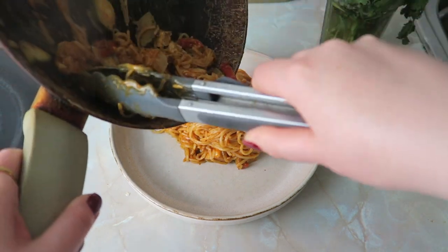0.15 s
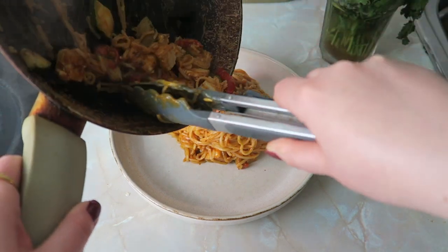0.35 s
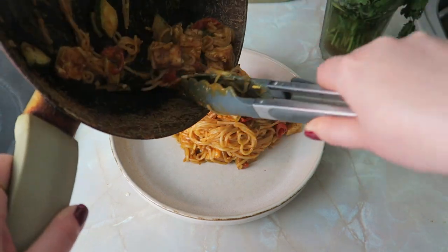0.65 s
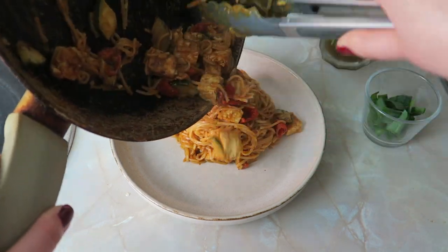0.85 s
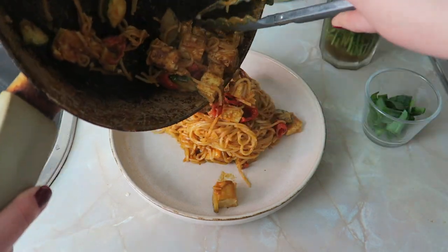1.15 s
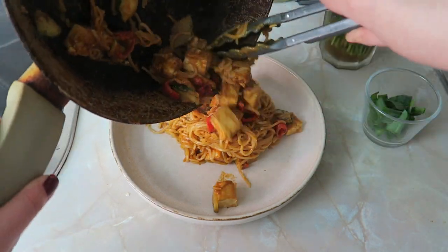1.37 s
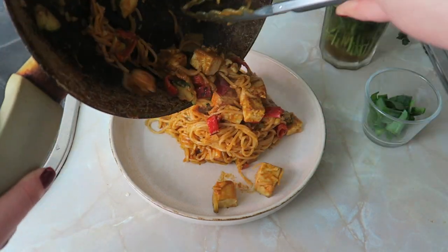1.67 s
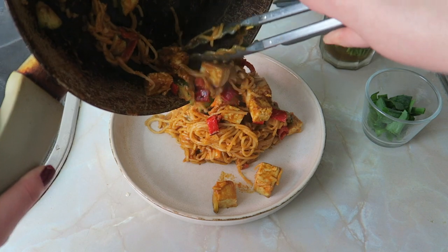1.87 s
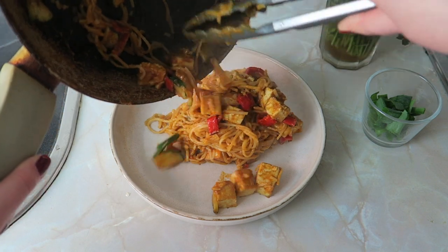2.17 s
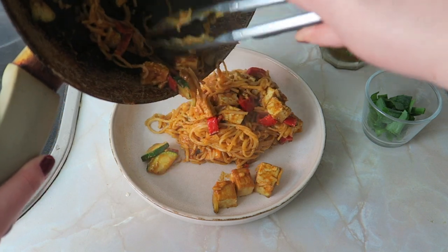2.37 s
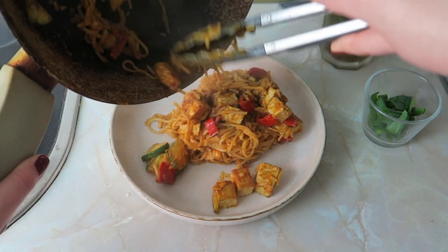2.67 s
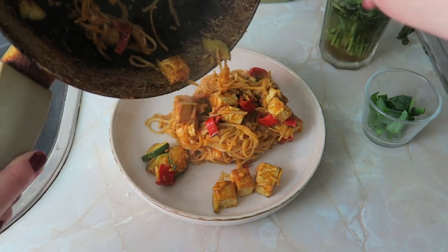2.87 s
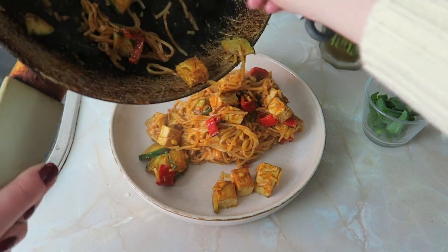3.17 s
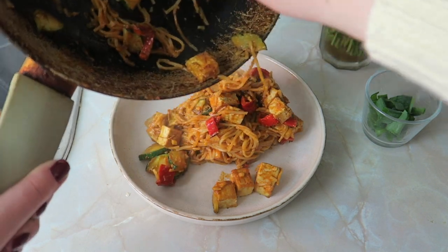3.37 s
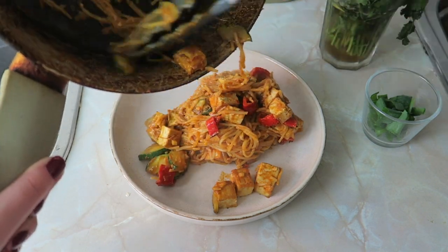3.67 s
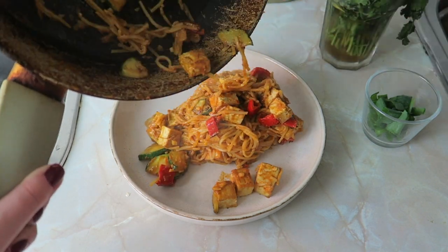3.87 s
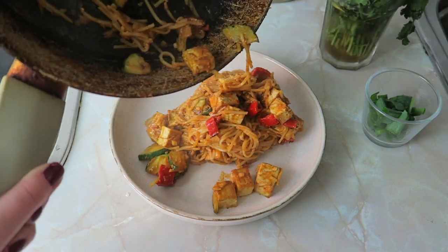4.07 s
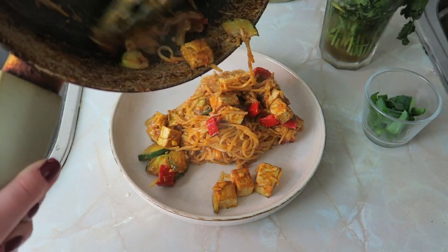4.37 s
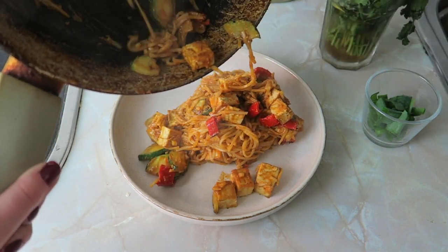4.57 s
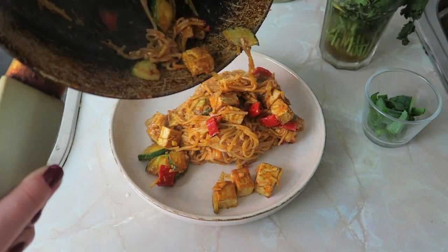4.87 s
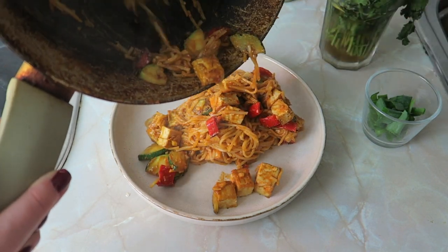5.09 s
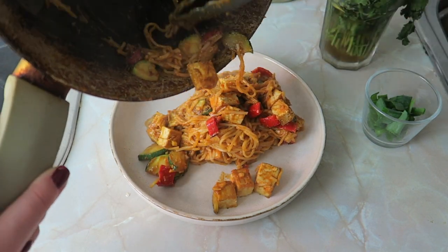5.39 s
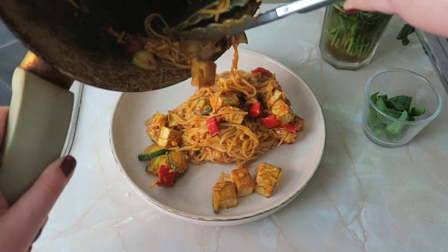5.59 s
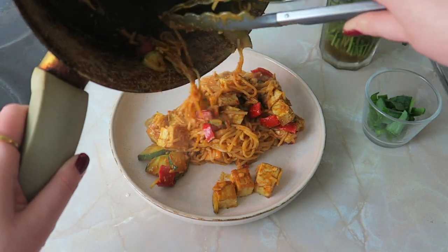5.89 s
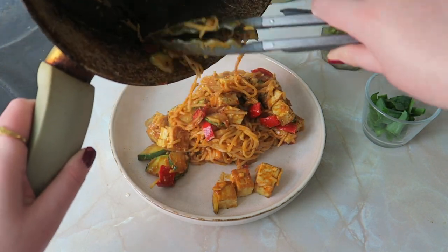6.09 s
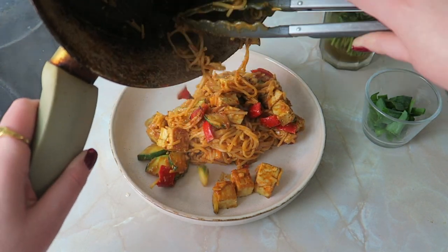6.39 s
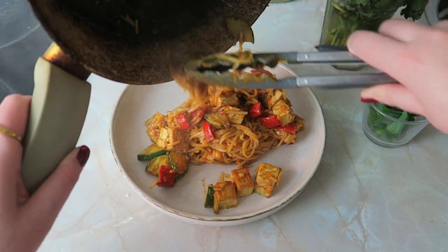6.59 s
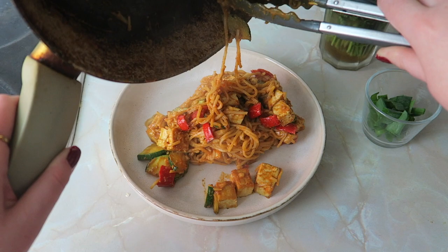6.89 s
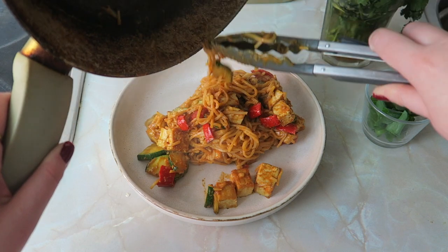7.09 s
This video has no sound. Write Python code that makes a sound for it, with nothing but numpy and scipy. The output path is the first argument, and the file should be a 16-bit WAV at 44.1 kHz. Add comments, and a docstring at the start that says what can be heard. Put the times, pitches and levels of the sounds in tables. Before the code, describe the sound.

Steel tongs tap and scrape a frying pan close by in a quiet kitchen, moist food thudding softly, sauce ticking, metal briefly ringing.

```python
"""Steel tongs tap and scrape a frying pan held over a plate, close to a camera in a quiet kitchen.
Blows and friction drive the same pan modes; food thuds, sauce ticks, a sleeve puffs air at the microphone."""
import sys
import numpy as np
from scipy import signal
from scipy.fft import rfft, irfft, next_fast_len
from scipy.io import wavfile
from scipy.ndimage import uniform_filter1d

SR = 44100
rng = np.random.default_rng(int(sys.argv[2]) if len(sys.argv) > 2 else 0)


def transcribe(signal):
    """Save signal, clipped to [-1, 1], as a 16-bit WAV file at the path in sys.argv[1]."""
    frames = np.atleast_2d(signal).T
    limited = np.clip(frames, -1, 1)
    pcm = np.round(limited * 32767).astype(np.int16)
    wavfile.write(sys.argv[1], SR, pcm)


N = 319279

# the pan's modes: (Hz, dB)
PAN = [(675, -5.5), (700, -7), (750, 0), (812, -19), (902, -16), (1027, -18.5), (1088, -7.5), (1116, -12), (1335, -28.5),
       (1600, -11.5), (1645, -16), (2425, -11), (2455, -12.5), (2530, -12.5), (2700, -22), (3100, -19),
       (3200, -19.5), (3410, -15.5), (3870, -19), (3905, -22.5), (4470, -16), (4850, -22), (5400, -23.5),
       (5660, -24.5), (6090, -25.5), (6930, -26.5), (8200, -35)]
# pan wall, handle and food, damped by the hand: (Hz, dB)
BODY = [(130, -11.5), (235, -5.5), (283, -4), (342, -5), (392, -4), (452, -5.5)]
# tongs meeting the pan: (s, peak dB, hardness dB, thud dB, modes near RIM_HZ dB: where the blow lands)
BLOWS = [(0.147, -36, -28, -13, -4), (0.358, -29, -24, -3, -3), (0.658, -36, -26, -15, -4), (1.098, -19.5, -12.5, -5.5, -11), (1.213, -40, -13, 4, -4),
         (1.232, -37, -22, 4, -4), (1.794, -28, -1, -1, 0), (2.368, -21, -3.5, 0, 4), (2.462, -13.5, -31, -0.5, -2), (3.075, -27, -18.5, 1, -2),
         (3.27, -12.5, -26, -19, 0), (4.144, -32, -4, 6, -1.5), (4.22, -32, -8, -1, -5), (4.269, -17, -12, -21, -2), (4.766, -24, -15.5, -13, 0),
         (4.84, -24, -17, -25, -4), (4.943, -8, -24, -30, 0), (5.188, -18.5, -11, -19, 0), (5.461, -36.5, 3, 6.5, 0), (6.044, -32.5, 1, 1.5, 1.5),
         (6.503, -24, -20, -7.5, 3), (7.117, -31, -14.5, -7, -7)]
# sticky sauce letting go: (s, peak dB, pitch Hz)
TICKS = [(0.1297, -46, 6000), (0.186, -51, 7000), (0.3117, -43.5, 3880), (0.4237, -43, 2350), (0.822, -57, 11000), (0.9898, -41, 2400), (0.9997, -40, 7040),
         (1.264, -46.5, 6300), (1.3014, -53, 6700), (1.3404, -50, 9000), (1.4197, -49, 9500), (1.4691, -46, 4400), (1.517, -48, 7340), (1.5372, -46, 3550),
         (1.7223, -46.5, 6270), (2.0346, -51, 10500), (2.075, -54, 7000), (3.026, -49.5, 10700), (4.5185, -36, 7540), (4.6833, -59, 10000), (5.1128, -54, 9000),
         (6.2721, -52, 11000), (6.3709, -53.5, 11600), (6.6476, -39, 8600)]
# air pushed at the ports by a sleeve: (s, peak dB, left-right dB)
PUFFS = [(3.811, -39, 3), (3.828, -38, 9), (3.931, -30, 4), (3.978, -35, 7.5)]
KITCHEN = [(15, -32), (25, -9.5), (125, -6), (150, -3), (181, -5.5), (415, -5.5), (558, -12.5), (1580, -20.5), (12500, -44), (14000, -47), (14800, -64)]  # (Hz, dB per Hz)
ALIKE = [(60, 0.99), (200, 0.25), (550, 0.0087)]  # (Hz, left-right likeness)
HISS = [(3000, 3), (6000, 4), (12000, -3.5), (15500, -27)]  # steel edge: (Hz, dB per Hz)
WALLS = [(200, 0.49), (2000, 0.13), (10000, 0.18)]  # (Hz, t60 s)
TOP_HZ = 15800  # fixed
PAN_T60 = [(700, 0.05), (750, 0.2), (900, 0.09), (1100, 0.17), (2500, 0.13), (8000, 0.054)]  # (Hz, s)
DRAG = [(0.405, -41.5, 0.095), (1.197, -36.5, 0.066), (1.863, -37.5, 0.059), (2.483, -32, 0.026), (3.304, -30, 0.075), (3.51, -39.5, 0.16), (5.293, -43.5, 0.12)]  # food dragged over the wall: (s, dB, half length s)
GRIT = [(560, -24), (900, 8.5), (2500, 2), (5500, -8.5), (9000, -32)]  # the pan's many weak modes, blurred: (Hz, dB per Hz)
# firm scrapes over the pan: hiss of the steel edge over the grit (dB), then (s, pressure dB, grit dB)
SCRAPES = [
    (-8.5, [(3.18, -32.5, -63.5), (3.24, -53, -37.5), (3.27, -30, -34), (3.295, -12, -31.5), (3.335, -10.5, -34.5), (3.375, -23.5, -34.5), (3.44, -32.5, -48),
           (3.505, -16, -35.5), (3.575, -35, -45.5), (3.625, -29, -42.5), (3.77, -34, -47.5), (3.84, -61, -65.5)]),
    (-21.5, [(4.19, -68, -54), (4.245, -28, -28.5), (4.28, -16, -26), (4.33, -22.5, -35), (4.38, -29.5, -30), (4.44, -20, -25), (4.49, -50, -42.5), (4.57, -49, -53)]),
    (-20, [(4.79, -40, -55), (4.865, -15.5, -26.5), (4.915, -22, -32), (4.945, -10, -26), (4.985, -23, -21.5), (5.02, -29.5, -30), (5.09, -36, -47)]),
    (-24, [(5.22, -26.5, -52), (5.255, -23.5, -37.5), (5.31, -24.5, -17), (5.37, -35, -43), (5.44, -44, -48.5)]),
]
# light rubs: (start s, length s, pressure dB, grit dB, hiss dB)
RUBS = [(0.151, .05, -30, -51.5, -61.5), (0.264, 0.081, -37.5, -54.5, -65), (0.34, 0.1, -42.5, -55.5, -61), (0.472, 0.086, -32, -53.5, -65),
        (0.54, 0.052, -37.5, -53, -63.5), (0.653, 0.016, -32.5, -52, -63), (1.162, 0.05, -33.5, -58.5, -64), (1.824, .15, -39.5, -50, -61),
        (2.396, 0.034, -26, -33.5, -68), (2.49, .17, -31, -46.5, -57.5), (5.49, 0.23, -35.5, -53.5, -58.5), (6.111, 0.1, -39, -56, -59),
        (6.555, 0.054, -33.5, -52, -61.5), (7.05, 0.045, -44, -58, -69), (7.128, 0.022, -36, -40, -56)]
RISE_DB_PER_S, SAG_DB_PER_S, FALL_DB_PER_S = 700, 57, 397  # a rub sets in, tires, lets go
LOCK_HZ, LOCK_SHARE, LOCK_DRIFT = 750, 0.65, 2.46  # the slipping falls in step with this mode; drift in radians
FAINT_DB, FAINT_HZ = -58, 8000  # the many small ticks between the loud ones
THUD_T60, DRAG_T60 = 0.049, 0.099  # s
RIM_HZ, RIM_OCTAVES = 2500, 0.23
PRESSED, RING_GROWS = 0.61, 0.15  # share of the ring time left under the tongs; dB of upper ring per dB of grit


def amp(db):
    """Gain of a level in dB."""
    return 10 ** (np.asarray(db) / 20)


def unit(x):
    """x at rms 1."""
    return x / np.sqrt(np.mean(x ** 2) + 1e-20)


def along(points, hz):
    """(Hz, value) points on a log axis."""
    f, v = np.transpose(points)
    return np.interp(np.log(hz + 1), np.log(f + 1), v)


def wobble(rate):
    """A random curve, rate knots a second."""
    knots = rng.standard_normal(int(N * rate / SR) + 2)
    return np.interp(np.arange(N) * rate / SR, np.arange(len(knots)), knots)


def filtered(x, response):
    """x times a response of frequency."""
    m = next_fast_len(N + 8192)
    return irfft(rfft(x, m) * response(np.fft.rfftfreq(m, 1 / SR)), m)[..., :N]


def ring(force, hz, t60):
    """One mode: a unit blow gives a dying sine of height 1."""
    r, w = amp(-60 / (max(t60, .01) * SR)), 2 * np.pi * hz / SR
    return signal.lfilter([0, np.sin(w)], [1, -2 * r * np.cos(w), r * r], force)


def pan():
    """Friction and blows shake every mode; the moving contact point changes each mode's share."""
    press_db, grit_db, hiss_db = contact()
    peak_db, hard_db, rim_db = np.transpose(BLOWS)[[1, 2, 4]]
    catches = amp(2.4 * wobble(90) + 2.82 * wobble(400))  # the steel edge snags on the coating
    metal = np.zeros(N)
    for hz, db in PAN:
        t60 = along(PAN_T60, hz)
        bright = along([(760, 0.011), (810, 0.84), (1150, 0.6), (1500, 0.97)], hz)  # grit and hard contact reach the upper modes
        slide = amp(press_db - 27.5 + bright * (grit_db - press_db + 7.5 + RING_GROWS * (grit_db + 33.5)) + (2.0 + 2.6 * bright) * wobble(11)) * catches * slipping(hz, PRESSED * t60)
        soft_db = bright * (-5 * np.log2(hz / 2500) + 3.3 * rng.standard_normal(len(BLOWS)))  # blunt tips, a new spot each time
        soft_db += rim_db * np.exp(-(np.log2(hz / RIM_HZ) / RIM_OCTAVES) ** 2)
        metal += amp(db) * (ring(slide, hz, PRESSED * t60) + ring(blows(peak_db - 4 + soft_db + bright * (hard_db + 8.5), 0.0093), hz, t60))
    grit, hiss = (unit(filtered(patchy(depth_db=3.5), lambda f: amp(along(colour, f)))) for colour in (GRIT, HISS))
    crack = uniform_filter1d(np.abs(blows(peak_db + hard_db + 19.5, 0.13)), size=24)  # rattle after each blow
    pan_band = signal.butter(N=4, Wn=[620, 9000], btype="bandpass", fs=SR, output="sos")  # the pan's ring keeps to the band from 620 Hz to 9 kHz
    rasp = (amp(grit_db - 7.5) * catches + crack) * grit
    return signal.sosfilt(pan_band, metal) + rasp + (amp(hiss_db + 0.5) * unit(catches ** 1.04) + amp(-12) * crack) * hiss


def sauce():
    """Each tick is a short noisy snap around its pitch."""
    out, t = np.zeros(N + SR), np.arange(SR // 40) / SR
    for s, db, hz in TICKS + faint(count=45):
        edges = np.clip([hz / 1.58, hz * 1.44], 500, 16000)
        snap = signal.sosfilt(signal.butter(2, edges, "bandpass", fs=SR, output="sos"), rng.standard_normal(len(t)))
        out[round(s * SR):][:len(t)] += amp(db - 60 * t / 0.018) * unit(snap)
    return out[:N]


def sleeve():
    """A puff is one slow dip of pressure, stronger on one port."""
    t, out = np.arange(N) / SR, np.zeros((2, N))
    for s, db, side_db in PUFFS:
        u = (t - s) / 0.0039
        out -= amp(db + side_db * np.array([[1], [-1]])) * (1 - u * u) * np.exp(-u * u / 2)
    return out


def kitchen():
    """Steady room air, partly alike on both ports, over a slowly swelling rumble."""
    turn = lambda hz: np.arccos(np.clip(along(ALIKE, hz), -1, 1)) / 2
    mid, side = filtered(rng.standard_normal((2, N)), lambda hz: amp(along(KITCHEN, hz)) * [np.cos(turn(hz)), np.sin(turn(hz))])
    air = amp(-48.5 + 1.12 * wobble(3.313)) * unit(np.array([mid + side, mid - side]))
    low = filtered(rng.standard_normal(N), lambda hz: amp(along([(15, -14.5), (35, -8.0), (60, -26), (120, -83)], hz)))
    return air + amp(-59.5 + 2.1 * wobble(1.6)) * unit(low)


def walls(x):
    """Each frequency of the room's answer dies at its own speed."""
    hz, t, z = signal.stft(rng.standard_normal((2, SR // 2)), SR, nperseg=256)
    tail = signal.istft(z * amp(-60 * t / along(WALLS, hz)[:, None] + along([(300, -1.5), (1500, -10), (8000, 10.5)], hz)[:, None]), SR, nperseg=256)[1]
    return signal.fftconvolve(np.pad(x, (200, 0))[None], tail / np.linalg.norm(tail[0]), axes=1)[:, :N]




def blows(db, chatter_s):
    """Each contact is a burst of tiny random pushes that dies within chatter_s."""
    out, t = np.zeros(N + SR), np.arange(SR // 20) / SR
    for s, level in zip(np.transpose(BLOWS)[0], db):
        burst = amp(-60 * t / chatter_s) * rng.standard_normal(len(t))
        out[round(s * SR):][:len(t)] += amp(level) * burst / np.linalg.norm(burst)
    return out[:N]


def body():
    """The damped low modes take the thud of each blow and the drag of the food."""
    peak_db, thud_db = np.transpose(BLOWS)[[1, 3]]
    t = np.arange(N) / SR
    drag = sum(amp(db) * np.exp(-((t - s) / half) ** 2) for s, db, half in DRAG) * amp(-27.0 + 2.9 * wobble(25.13))
    rings = sum(amp(db) * (ring(drag * rng.standard_normal(N), hz, DRAG_T60) + ring(blows(peak_db + thud_db, .006), hz, THUD_T60)) for hz, db in BODY)
    return uniform_filter1d(rings, size=12, origin=5)  # soft contact carries no treble


def patchy(depth_db):
    """White noise whose loudness varies in patches of time and frequency."""
    z = signal.stft(rng.standard_normal(N), nperseg=256)[2]
    field = uniform_filter1d(uniform_filter1d(rng.standard_normal(z.shape), size=3, axis=0), size=8, axis=1)
    return signal.istft(z * amp(depth_db * unit(field)), nperseg=256)[1][:N]


def contact():
    """Pressure, grit and hiss in dB per sample; the strongest contact rules."""
    t, out = np.arange(N) / SR, np.full((3, N), -120.)  # fixed
    for edge_db, rows in SCRAPES:
        s, press_db, grit_db = np.transpose(rows)
        on = (t >= s[0]) & (t <= s[-1])
        out[:, on] = [np.interp(t[on], s, c) for c in (press_db, grit_db, grit_db + edge_db)]
    for s, length, *levels_db in RUBS:
        shape_db = (RISE_DB_PER_S * np.minimum(t - s, 0) - SAG_DB_PER_S * np.clip(t - s, 0, length)
                    - FALL_DB_PER_S * np.maximum(t - s - length, 0))
        out = np.maximum(out, np.array(levels_db)[:, None] + shape_db)
    return out


def slipping(hz, t60):
    """Friction force on one mode: random, but partly in step with the strongest mode."""
    share = LOCK_SHARE * (abs(hz - LOCK_HZ) < 20)  # fixed
    beat = np.sin(2 * np.pi * hz * np.arange(N) / SR + LOCK_DRIFT * wobble(9))
    return np.sqrt(1 - share) * rng.standard_normal(N) + np.sqrt(share * 2 * np.log(1000) / (t60 * SR)) * beat


def faint(count):
    """Rows like TICKS, at random moments."""
    u = rng.standard_normal((count, 2))
    return list(zip(rng.uniform(0, N / SR, count), FAINT_DB + 4 * u[:, 0], FAINT_HZ * np.exp(0.43 * u[:, 1])))


def scene():
    """Pan and food straight ahead in the kitchen."""
    near = pan() + body() + sauce()
    return near + amp(-4) * walls(near) + sleeve() + kitchen()


def record(dry):
    """The camera keeps nothing above its band limit."""
    return filtered(dry, lambda hz: hz < TOP_HZ)


dry = scene()
out = record(dry)
transcribe(out)
```